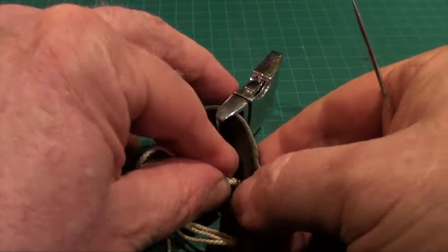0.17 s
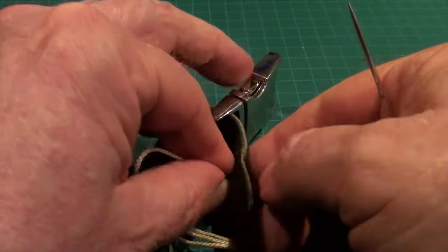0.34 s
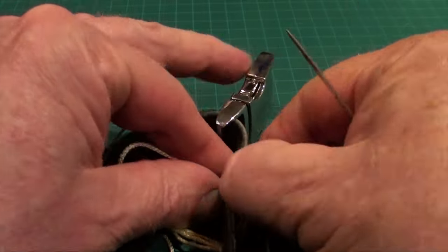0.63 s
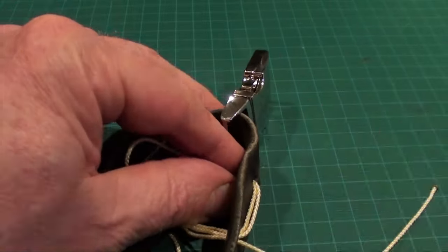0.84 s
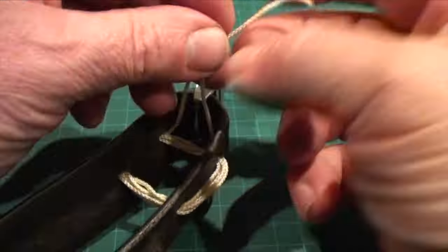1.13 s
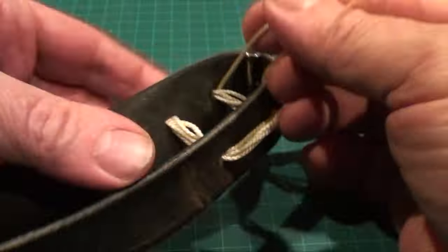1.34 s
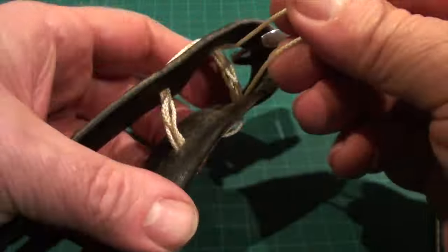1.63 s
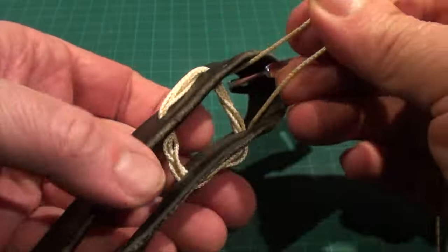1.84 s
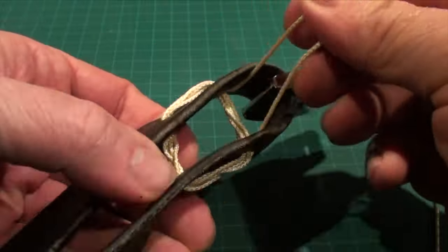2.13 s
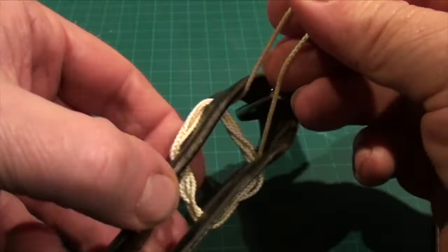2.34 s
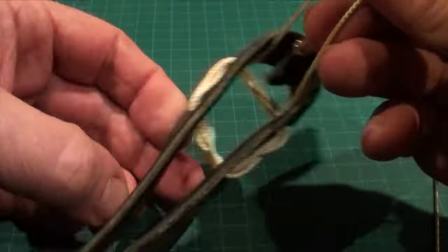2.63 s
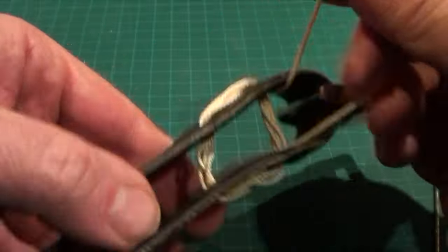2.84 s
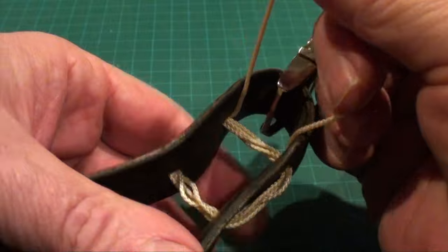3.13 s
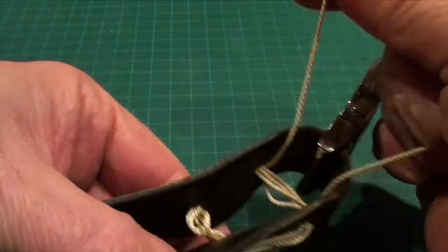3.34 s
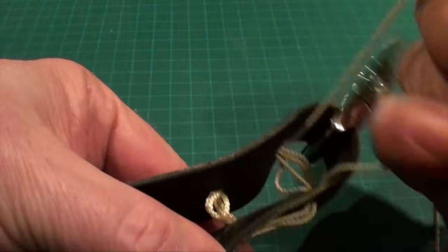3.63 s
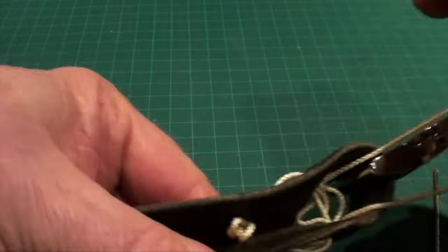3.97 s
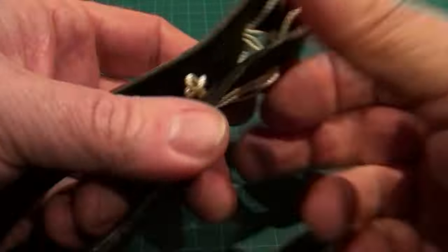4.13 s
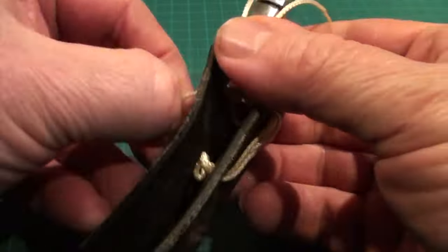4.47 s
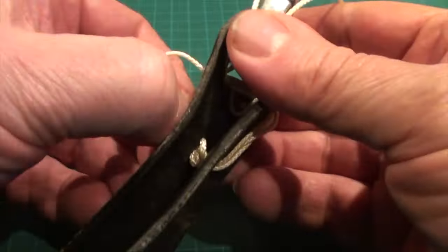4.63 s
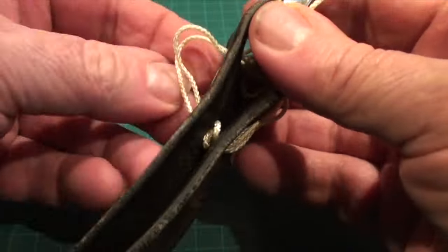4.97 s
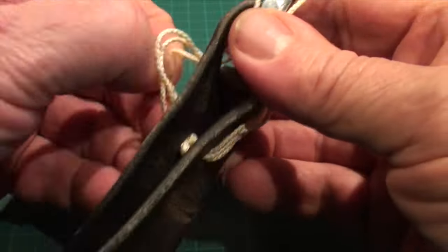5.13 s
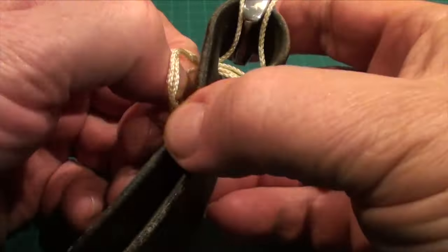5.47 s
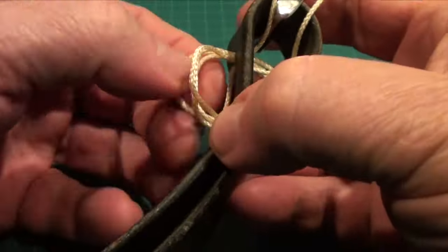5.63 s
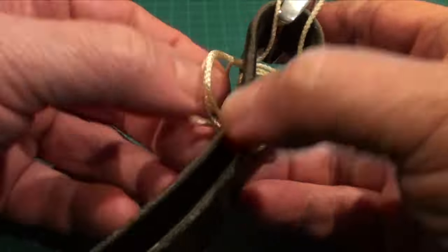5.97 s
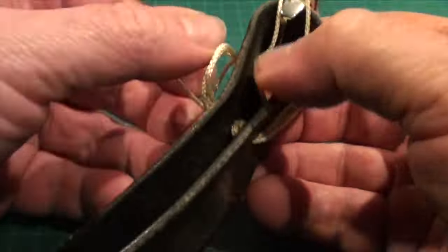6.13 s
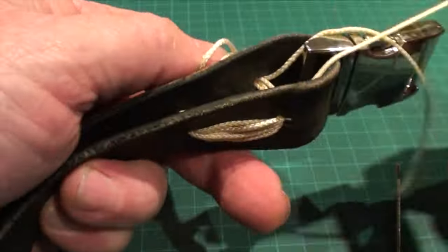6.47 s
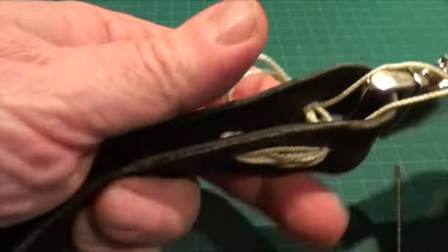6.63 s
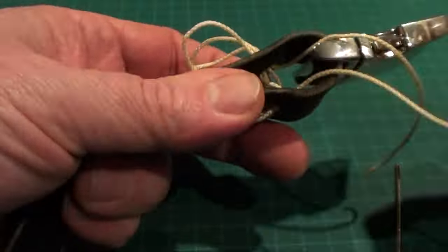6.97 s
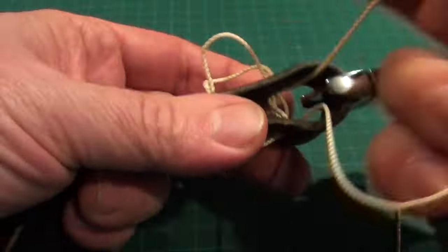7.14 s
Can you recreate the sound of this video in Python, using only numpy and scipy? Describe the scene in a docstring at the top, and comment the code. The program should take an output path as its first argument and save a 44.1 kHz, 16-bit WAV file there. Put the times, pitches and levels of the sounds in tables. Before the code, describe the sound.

Close, bright metal clicks, dry cord and leather rustles and a dull early double knock in a quiet humming room, busiest mid-way and at the end.

```python
"""Buckle, cord and leather at a bench

Close up in a small room, hands draw a cord through a leather strap: a steel buckle clicks as decaying modes
and noise cracks, cord and fingers rub as swelling grainy noise, and short low notes with puffs of noise make
soft thuds and the dull body under some clicks. The cord hisses in its hole and thin squeaks glide. Behind lie
shaped-noise hum, rumble and air, steady notes, a thin whine, and a bird beyond a window: rising sine whistles."""
import sys
import numpy as np
from scipy import signal
from scipy.fft import rfft, irfft, next_fast_len
from scipy.io import wavfile
from scipy.ndimage import map_coordinates

SR = 44100
rng = np.random.default_rng(int(sys.argv[2]) if len(sys.argv) > 2 else 0)


def wrap_up_sound(samples):
    """Save the sound to the file named by the first command line argument, as 16-bit audio."""
    columns = np.atleast_2d(samples).T
    # keep every value between -1 and 1, then stretch to whole-number steps
    tamed = np.clip(columns, -1, 1)
    steps = np.round(tamed * 32767).astype(np.int16)
    wavfile.write(sys.argv[1], SR, steps)


N = 321909  # length in samples


def amp(db):
    """Decibels to linear gain."""
    return 10 ** (np.asarray(db) / 20)


def unit(x):
    """Scale to an rms of 1."""
    return x / np.sqrt(np.mean(x ** 2) + 1e-20)


def along(points, hz):
    """Read (f/Hz, value) points on a log frequency axis."""
    f, v = np.transpose(points)
    return np.interp(np.log(hz + 1), np.log(f + 1), v)


def curves(rows):
    """One value per sample for each column after the time."""
    s, *cols = np.transpose(rows)
    return [np.interp(np.arange(N) / SR, s, c) for c in cols]


def wobble(rate):
    """A smooth random curve, rate knots a second."""
    knots = rng.standard_normal(int(N * rate / SR) + 4)
    return map_coordinates(knots, [np.arange(N) * rate / SR])


def filtered(x, response):
    """x times a response of frequency."""
    m = next_fast_len(x.shape[-1] + 8192)
    spectrum = rfft(x, m) * response(np.fft.rfftfreq(m, 1 / SR))
    return irfft(spectrum, m)[..., :x.shape[-1]]


def band(x, low_hz, high_hz):
    """A causal band-pass."""
    edges = [low_hz, min(high_hz, .45 * SR)]
    return signal.sosfilt(signal.butter(2, edges, "bandpass", fs=SR, output="sos"), x)


def bell(centre_hz, octaves):
    """A filter response with one soft hump, octaves wide to one standard deviation."""
    return lambda hz: np.exp(-.5 * (np.log2(hz / centre_hz + 1e-6) / octaves) ** 2)


def add(track, s, sound):
    """Mix a sound in at a time."""
    part = track[..., round(s * SR):][..., :sound.shape[-1]]
    part += sound[..., :part.shape[-1]]


# stereo width of the room noise: f/Hz, side minus mid level/dB
WIDTH = [(60, -16), (110, -31), (200, -34), (380, -21.5), (700, -7.5), (1290, -1.5), (2380, -4.5),
         (4400, -8.5), (8120, -10.5), (15000, -42)]


def rush(spectrum):
    """Diffuse stereo noise: independent mid and side, the mid at rms 1."""
    shape = lambda hz: amp(along(spectrum, hz)) * [np.ones_like(hz), amp(along(WIDTH, hz))]
    mid, side = filtered(rng.standard_normal((2, N)), shape)
    return np.array([mid + side, mid - side]) / np.std(mid)


# colour of the hum, before its low cut: f/Hz, relative level per Hz/dB
HUM = [(50, -69), (85, -11.5), (167, -5.5), (206, -1), (236, -4.5), (325, -11), (396, -3), (529, -15),
       (584, -16.5), (779, -22), (851, -35.5), (890, -30), (1010, -48), (1100, -33), (1200, -35),
       (1560, -37.5), (2640, -120)]
# loudness of the hum, before its low cut: t/s, level/dB
HUM_DB = [(0, -43), (1.3, -43.5), (1.7, -43), (3.4, -45), (3.7, -43), (4.7, -44.5), (7.3, -45.5)]
# narrow notes in the hum: f/Hz, mean peak level/dB
ROOM_TONES = [(215.3, -55), (236.9, -47.5), (285.3, -53.5), (376.8, -60), (839.8, -65.5)]


def hum():
    """Low shaped noise, nearly steady, with narrow notes that waver in level and phase."""
    t = np.arange(N) / SR
    level = amp(curves(HUM_DB)[0] + 0.4 * wobble(2.81))
    low_cut = lambda hz: 1 / (1 + (106 / (hz + 1)) ** 14)
    out = level * filtered(rush(HUM), low_cut)
    for hz, db in ROOM_TONES:
        # the lower the note, the more its level wavers
        out += amp(db + 900 / hz * wobble(6.4)) * np.sin(2 * np.pi * hz * t + 0.78 * wobble(4))
    return out


# the bench and the floor rumble: t/s, level/dB
RUMBLE = [(0, -79), (.55, -60.5), (.75, -69), (1.35, -71), (1.7, -54.5), (1.82, -47), (2.01, -84),
          (2.15, -59), (2.26, -69), (3.5, -74), (4.49, -68), (5.05, -73), (7.3, -78)]


def rumble():
    """A narrow noise band at 72 Hz that comes and goes, over a faint broad bed of low noise."""
    narrow = lambda hz: np.exp(-.5 * ((hz - 72) / 11) ** 2)
    moving = amp(curves(RUMBLE)[0]) * unit(filtered(rng.standard_normal(N), narrow))
    deep = amp(-70.0) * unit(filtered(rng.standard_normal(N), bell(70, 2.6)))
    return moving + deep


# colour of the room's air: f/Hz, relative level per Hz/dB
AIR = [(530, -8.5), (900, -3), (2020, -6.5), (2600, -7.5), (2830, -8), (5280, -7.5), (6030, -8),
       (8150, -10), (16000, -13.5)]


def air():
    """Smooth wide noise with a slightly uneasy level."""
    mean_db = -55
    return amp(mean_db + 0.4 * wobble(5.1)) * rush(AIR)


# thin tone: t/s, mean f/Hz, mean level/dB
WHINE = [(0, 2507, -60.5), (1.2, 2515, -65.5), (2.5, 2500, -69), (5.3, 2520, -67.5), (7.3, 2590, -70)]


def whine():
    """A drifting sine with a weak octave, its fundamental offset in phase between the channels."""
    hz, db = curves(WHINE)
    turn = 2 * np.pi * np.cumsum(hz + 6 * wobble(17)) / SR
    tone = np.sin(turn + np.array([[0], [1.2]])) + 0.21 * np.sin(2 * turn)
    return amp(db + 2.1 * wobble(25)) * tone


def room_tone():
    """The background bed: four independent layers simply add."""
    return hum() + rumble() + air() + whine()


# bird calls: t/s, relative level/dB, share of the rise left out (0-1), top f/Hz, length/s
BIRD = [(5.318, -60, .45, 4420, .155), (5.495, -58, 0, 4460, .115), (5.64, -58, 0, 4360, .11),
        (5.784, -59, 0, 4320, .12), (5.928, -58.5, 0, 4310, .11), (6.07, -58, 0, 4310, .105)]


def bird():
    """A rising, fluttering, slightly hoarse sine whistle repeated, thickened by close echoes."""
    low_hz, glide_s, knee = 2650, .031, 1.7  # climbs almost straight, then bends over onto its top pitch
    swell_s, fade_db_per_s = .024, 10
    flutter_hz, flutter_db = 42, 2.5
    out = np.zeros(N)
    for start, level_db, left_out, top_hz, length in BIRD:
        t = np.arange(int(length * SR)) / SR
        hz = top_hz - (top_hz - low_hz) * np.exp(-(t / glide_s) ** knee)
        swell = np.clip((t - left_out * glide_s * 2) / swell_s, 0, 1)
        close = np.clip((length - t) / swell_s, 0, 1)
        shape = swell * amp(-fade_db_per_s * t) * close
        flutter = amp(flutter_db * np.sin(2 * np.pi * (flutter_hz * t + rng.random())))
        tone = np.sqrt(2) * np.sin(2 * np.pi * np.cumsum(hz) / SR)
        add(out, start, amp(level_db) * shape * flutter * tone)
    out = out * amp(1.5 * wobble(50)) * (0.85 + .4 * wobble(500))  # hoarseness
    # nearby walls outside repeat it at once and thicken the rise: (lag s, dB)
    echoes = [(.005, -6), (.011, -11), (.024, -16), (.043, -15)]
    return out + sum(amp(db) * np.roll(out, round(lag * SR)) for lag, db in echoes)


# soft thuds, and the dull low body under some buckle and leather clicks:
# t/s, level/dB, f/Hz, contact/s, left minus right level/dB
THUDS = [(0.528, -34.5, 1270, 0.00067, 0), (0.547, -39, 1310, 0.00061, 0), (1.0145, -23, 755, 0.0014, -7.5),
         (1.0274, -17.5, 670, 0.001, 4.5), (1.0385, -26.5, 496, 0.0013, -4), (1.162, -36, 1420, 0.001, 1),
         (1.29, -40, 700, 0.0018, -1), (4.26, -34, 1950, 0.00054, -1), (3.593, -47, 1320, 0.00055, 0),
         (3.739, -36, 1610, 0.00037, -4)]


def thuds():
    """A soft blow: a short note that swells and dies with the contact, a low push and a puff of noise."""
    out, t = np.zeros((2, N)), np.arange(SR // 8) / SR
    for s, db, hz, contact, pan_db in THUDS:
        press = lambda length: t / length * np.exp(1 - t / length)
        note = press(contact) * np.sin(2 * np.pi * hz * t)
        push = 0.5 * press(2.0 * contact) * np.sin(2 * np.pi * 0.374 * hz * t)
        noise = unit(band(rng.standard_normal(len(t)), 0.048 * hz, 3 * hz))
        puff = 0.27 * press(1.95 * contact) * noise
        sides_db = np.array([[pan_db / 2], [-pan_db / 2]])
        add(out, s, amp(db + sides_db) * (note + push + puff))
    return out


# the cord whistles in its hole: t/s, centre f/Hz, level/dB
HISS = [(4.93, 7400, -69), (5.018, 7250, -63), (5.118, 6700, -58), (5.2, 6850, -55), (5.27, 7000, -56),
        (5.33, 6900, -66)]


def whistle():
    """A narrow hiss, low noise multiplied by a sine, whose centre drifts as the cord runs."""
    hz, db = curves(HISS)
    t = np.arange(N) / SR
    first, last = HISS[0][0], HISS[-1][0]
    running = np.interp(t, [first, first + .04, last - .04, last], [0, 1, 1, 0])
    width = unit(band(rng.standard_normal(N), 4.3, 340))
    carrier = np.sqrt(2) * np.sin(2 * np.pi * np.cumsum(hz) / SR)
    return running * amp(db) * width * carrier


# faint thin squeaks: start t/s, end t/s, start f/Hz, end f/Hz, mean level at mid-squeak/dB
SQUEAKS = [(4.612, 4.68, 5900, 6200, -63), (4.62, 4.648, 4430, 4480, -64), (4.78, 4.815, 4780, 4850, -61),
           (6.076, 6.145, 2600, 2760, -65), (1.303, 1.35, 2950, 2920, -62)]


def squeaks():
    """Short gliding sines with an unsteady level."""
    out = np.zeros(N)
    for start, end, start_hz, end_hz, db in SQUEAKS:
        count = round((end - start) * SR)
        hz = np.linspace(start_hz, end_hz, count)
        tone = np.sin(2 * np.pi * np.cumsum(hz) / SR)
        add(out, start, amp(db) * np.sqrt(2 * np.hanning(count)) * tone)
    return out * amp(2 * wobble(120))


# cord and fingers on leather: start t/s, length/s, level before the swell/dB, centre f/Hz, width/octaves
STROKES = [(0.522, 0.068, -49, 2800, 1.3), (0.752, 0.065, -52, 4000, 1.6), (0.996, 0.1, -45.5, 2000, 1.3),
           (0.998, 0.14, -42.5, 550, 0.72), (1.097, 0.08, -53, 1440, .2), (1.07, 0.11, -53.5, 2190, 1.9),
           (1.149, 0.023, -49.5, 2260, 0.57), (1.338, 0.23, -50, 5330, 0.81),
           (1.737, 0.24, -59.5, 7600, .5), (2.153, 0.27, -57.5, 11100, 1.6), (2.413, 0.094, -55, 4000, 1.1),
           (3.183, 0.43, -58.5, 5570, 0.74), (3.592, 0.11, -46.5, 5600, 0.6), (3.673, 0.18, -50, 4000, 3.7),
           (3.858, 0.12, -57, 11000, 3.9), (3.968, 0.2, -55, 4000, 1.2), (4.17, 0.23, -53.5, 1890, 1.5),
           (4.358, 0.13, -56.5, 1150, 0.79), (4.264, 0.11, -60, 11100, 1.6), (4.65, 0.18, -54, 4100, 1.1),
           (5.151, 0.09, -45.5, 4030, 1.6), (5.151, 0.073, -49.5, 3200, 0.1), (5.41, 0.081, -55, 4320, 1.4),
           (5.957, 0.27, -61, 4000, 0.89), (6.199, 0.19, -52.5, 5860, 0.69), (6.454, 0.17, -43.5, 4300, 1),
           (6.644, 0.19, -50, 5600, 1), (6.902, 0.33, -53, 4230, 1.04), (7.182, 0.099, -45, 8000, 0.78)]


def rubbing():
    """Fibres catch and slip: grainy noise that swells and fades with each stroke."""
    rise, square = .35, .8  # share spent swelling; a power under 1 holds the stroke and ends it abruptly
    out = np.zeros(N)
    grain = amp(2.8 * wobble(900) + 2.1 * wobble(120)) * rng.standard_normal(N)
    for start, length, db, centre_hz, width in STROKES:
        piece = grain[round(start * SR):][:round(length * SR)]
        progress = np.arange(len(piece)) / (length * SR)
        swell = np.sin(np.pi / 2 * np.interp(progress, [0, rise, 1], [0, 1, 0])) ** square
        add(out, start, amp(db) * swell * unit(filtered(piece, bell(centre_hz, width))))
    return out


def ticks():
    """Faint chance contacts shaken out by each stroke, as rows like CLICKS; four tries a stroke."""
    per_s, over_stroke_db, scatter_db, chatter_ms = 4, 3, 2, 2
    frame_hz, parts_db = 7200, (-16, -16, -2, -12, -20, -20)  # the other parts over the frame
    rows = []
    for start, length, db, *_ in STROKES:
        when, odds = rng.random((2, 4))
        size = rng.standard_normal(4)
        happens = (odds < per_s * length / 4) & (start + length * when < N / SR)
        peaks = db + over_stroke_db + scatter_db * size
        for u, peak in zip(when[happens], peaks[happens]):
            rows.append((start + length * u, peak, frame_hz, *np.add(peak, parts_db), chatter_ms))
    return rows


def strike(chatter, part, t, loose):
    """One part answers the blows with decaying sine modes and a crack of band noise, at peak 1."""
    low_hz, high_hz, crack_db, modes = part
    detune_s = .00008  # the shorter a mode lives, the more its pitch shifts from blow to blow
    long_s, loose_db, held_db = .05, 11, -3  # longer modes come out when loose, are muted when held
    hz, level, t60 = np.transpose(modes)[:, :, None]
    level_scatter, pitch_scatter = rng.standard_normal((2, len(modes), 1))
    level = level + (t60 > long_s) * (loose_db if loose else held_db)
    decay = amp(level + 4 * level_scatter - 60 * t / t60)
    mode_hz = hz * (1 + detune_s / t60 * pitch_scatter)
    ring = np.sum(decay * np.sin(2 * np.pi * mode_hz * t), 0)
    ring = signal.fftconvolve(chatter, ring)[:len(t)]
    crack = band(band(chatter, low_hz, high_hz), 0.76 * low_hz, 6.5 * high_hz)
    crack = np.pad(crack, (0, len(t) - len(chatter)))
    sound = ring / np.abs(ring).max() + amp(crack_db) * crack / np.abs(crack).max()
    return sound / np.abs(sound).max()


# buckle contacts: t/s, frame peak level/dB, frame f/Hz as gripped, then peak level/dB of lower ring note,
# upper ring note, leather loop, prong, bar, roller; chatter/ms (time to fall 12 dB)
CLICKS = [(0.2456, -66.0, 6200.0, -30.5, -62, -57, -58.0, -66.0, -66.0, 1.9),
          (0.5284, -39, 7700.0, -53, -57, -34.5, -54.0, -53, -66.0, 4.1),
          (0.5484, -50, 6500.0, -55, -58, -49, -63.0, -57.0, -66.0, 9),
          (0.611, -51.0, 7100.0, -66.0, -60, -42, -66.0, -64.0, -66.0, 2.2),
          (0.6312, -43.0, 6500, -55.0, -66.0, -45, -37, -53, -58, 5.4),
          (0.7354, -48, 7200, -26, -57, -27.5, -52, -63.0, -63.0, 3.2),
          (0.796, -31, 7800, -45, -58, -49, -52, -65.0, -66.0, 4.5),
          (1.0137, -35, 7160, -32, -47.0, -31, -64.0, -56.0, -64.0, 4.5),
          (1.0334, -38, 6560, -40, -45.0, -48, -66.0, -61.0, -66.0, 10.0),
          (1.2414, -50, 8700, -66.0, -66.0, -45, -58.0, -66.0, -66.0, 3.2),
          (1.2627, -54, 6800.0, -28, -60, -35, -51, -60.0, -66.0, 4.9),
          (1.289, -35.0, 6600, -27.5, -51, -33, -44.0, -42, -57.0, 4.7),
          (1.3956, -35, 7130, -36, -54, -38.5, -46, -62.0, -59.0, 11),
          (1.407, -52.0, 6200.0, -34, -59.0, -46, -66.0, -51.0, -66.0, 3.2),
          (1.478, -38.0, 8000.0, -58, -68, -47, -51.0, -45, -53.0, 2.2),
          (1.8128, -38, 6900, -51.0, -43, -57, -56.0, -61.0, -59.0, 6.7),
          (1.8265, -31, 6170, -44, -60, -46, -52, -64.0, -66.0, 1.7),
          (2.0328, -26, 7540, -66.0, -50, -52, -43, -66.0, -46, 4.9),
          (2.0862, -39, 8100, -61.0, -61, -48, -62.0, -66.0, -64.0, 1.5),
          (2.2975, -26, 7990, -39, -53, -50, -36, -56.0, -53.0, 2.8),
          (2.3454, -27.5, 7900, -34.5, -47, -48, -38, -65.0, -65.0, 2.7),
          (2.4473, -42, 6840, -43.0, -63.0, -51, -61.0, -54.0, -63.0, 9.3),
          (2.4578, -50, 7100.0, -38, -39, -51, -55.0, -53.0, -66.0, 6.2),
          (2.5189, -31.5, 6930, -41, -48, -65, -43.0, -31.5, -50.0, 2.8),
          (2.6324, -34.5, 7650, -27.5, -54, -65, -39, -44, -60.0, 16),
          (2.6573, -25.5, 7630, -37, -46, -50, -44, -20, -24, 3.4),
          (2.7197, -39, 8050, -42, -63, -66.0, -66.0, -66.0, -44, 2.2),
          (2.7455, -34, 7740, -36, -51, -36, -52.0, -61.0, -66.0, 3.6),
          (2.7612, -31, 6850, -36, -44.5, -47, -35, -39, -43.0, 5.9),
          (2.7803, -38, 6840, -42, -49, -56.0, -47.0, -43, -50.0, 1.5),
          (2.9202, -33.5, 6200, -47, -55, -44, -39, -66.0, -54.0, 1.6),
          (2.944, -36, 6200.0, -55, -63.0, -45, -53.0, -66.0, -62.0, 3.6),
          (3.1018, -34, 7800, -53.0, -48, -48, -52, -54.0, -60.0, 5.2),
          (3.1199, -33, 7860, -39, -57.0, -66.0, -47.0, -38.5, -62.0, 7.4),
          (3.1443, -39, 6760, -40, -48, -62, -66.0, -66.0, -66.0, 2.2),
          (3.2175, -40.5, 7000, -50.0, -47.0, -44.0, -58.0, -66.0, -66.0, 4.9),
          (3.2625, -47.0, 6350, -59.0, -60, -46.0, -66.0, -66.0, -66.0, 1.5),
          (3.2828, -33.5, 6160, -48, -47, -40, -42, -40, -52, 2.8),
          (3.295, -67, 6800.0, -54.0, -45, -36, -66.0, -66.0, -66.0, 2.7),
          (3.3811, -37, 7900, -35.5, -65.0, -36.5, -55, -66.0, -60.0, 3.1),
          (3.5332, -23.5, 8000, -47, -56, -61, -25, -29, -57.0, 3.9),
          (3.584, -39, 7400.0, -49.0, -52, -42, -56.0, -66.0, -66.0, 6.5),
          (3.5922, -21.0, 7200, -20, -25, -29, -26.5, -44, -52.0, 3.8),
          (3.614, -29, 7700.0, -66.0, -65.0, -37, -47.0, -59.0, -50.0, 3.2),
          (3.6284, -13, 7130, -45, -57, -48, -19, -20, -32, 3.4),
          (3.6556, -23, 6600, -33, -40, -53, -40.0, -64.0, -64.0, 4),
          (3.69, -35, 8500, -43, -45, -57.0, -65.0, -61.0, -60.0, 2.2),
          (3.7125, -35, 7100.0, -36, -47.0, -49, -49.0, -60.0, -60.0, 4.9),
          (3.7254, -32, 8300, -68, -69, -66.0, -66.0, -66.0, -59.0, 1.5),
          (3.733, -35, 7700.0, -32, -36, -54, -66.0, -56.0, -51, 6.3),
          (3.7379, -37, 8600.0, -24, -63.0, -63.0, -63.0, -37, -63.0, 1.3),
          (3.748, -41.0, 6500.0, -66.0, -34, -66.0, -50.0, -49.0, -43.0, 4.5),
          (3.7742, -23.5, 7600, -27.5, -31, -64, -36, -38, -35, 8.3),
          (3.796, -36, 8000.0, -66.0, -27, -50, -38, -56.0, -66.0, 5.9),
          (3.8691, -38, 7700.0, -38.0, -51, -49, -57.0, -51.0, -62.0, 3.5),
          (3.8802, -37, 7900, -33, -50, -56, -49.0, -45, -58.0, 3.5),
          (3.92, -51.0, 8000.0, -45, -44, -36, -66.0, -66.0, -66.0, 2.2),
          (3.9287, -37, 7060, -44, -48, -55.0, -54.0, -50.0, -66.0, 9.3),
          (3.9569, -22, 6380, -34, -39, -51, -39.0, -31, -43.0, 3.6),
          (4.0243, -37, 7500, -38, -49, -40, -54.0, -58.0, -66.0, 13),
          (4.0383, -26.5, 6000, -52, -49, -38, -47.0, -44, -65.0, 3.9),
          (4.0734, -36, 7350, -37, -45.0, -42, -36, -55, -58.0, 0.99),
          (4.1187, -38, 6800.0, -42.0, -46, -46, -52.0, -63.0, -66.0, 1.7),
          (4.135, -37, 7800, -42, -55.0, -54.0, -59.0, -60.0, -59.0, 9.6),
          (4.1742, -31.5, 7300, -40.0, -46, -35.5, -32.5, -43, -42, 6.2),
          (4.2607, -54, 6500.0, -52.0, -51, -28.5, -66.0, -66.0, -65.0, 3.5),
          (4.2667, -55, 7100.0, -45, -66.0, -31, -66.0, -66.0, -66.0, 1.5),
          (4.372, -40, 7160, -40, -58, -36, -55.0, -66.0, -58.0, 1),
          (4.4075, -34.5, 8500, -66.0, -66.0, -46, -37, -60.0, -66.0, 0.94),
          (4.5271, -37.5, 7000, -40, -54, -49, -47.0, -42, -54.0, 2.9),
          (4.6116, -58, 6200.0, -55, -65, -34.5, -60.0, -64, -61.0, 1.2),
          (4.6693, -33, 7500, -50, -66.0, -42, -35, -58.0, -52, 3.2),
          (4.8286, -40, 7940, -63, -67, -32, -48, -59, -54, 2.5),
          (4.9556, -33.5, 7060, -57.0, -64.0, -49, -57.0, -44, -65.0, 2.7),
          (5.0424, -40, 7600.0, -49, -66.0, -38.5, -60.0, -47, -65.0, 4),
          (5.1527, -40, 7060, -51, -57.0, -52, -54.0, -47, -55.0, 10.0),
          (5.1836, -35, 7150, -52.0, -55.0, -42, -54.0, -51.0, -56.0, 10.0),
          (5.2107, -27, 7800, -50, -48, -21.5, -43.0, -48.0, -38, 3),
          (5.239, -48.0, 7700.0, -43, -66.0, -30, -53.0, -59.0, -55.0, 3.2),
          (5.247, -24, 7150, -30, -54.0, -35, -49, -33, -61.0, 1.3),
          (5.3956, -41, 6800.0, -49, -60.0, -41, -66.0, -66.0, -66.0, 7.7),
          (5.4159, -32, 8000.0, -50, -53.0, -27.5, -40.0, -32, -43, 1.8),
          (5.4345, -35, 7800, -59.0, -57.0, -52, -54.0, -60.0, -58.0, 2),
          (5.453, -43, 6200.0, -54.0, -57.0, -42, -58, -61.0, -66.0, 10.0),
          (5.5877, -31, 8630, -46, -49, -35, -47.0, -45, -46, 3.6),
          (5.768, -45, 8600.0, -48, -66.0, -42, -58.0, -51, -65.0, 1.6),
          (5.8944, -63, 7400.0, -62, -67, -38.5, -66.0, -64.0, -66.0, 2.2),
          (6.0202, -39.5, 7060, -52, -48, -43, -62.0, -59, -54, 4),
          (6.029, -46, 8600.0, -66.0, -66.0, -49, -66.0, -66.0, -66.0, 1.5),
          (6.3377, -36, 6600, -54.0, -38.0, -42, -50.0, -66.0, -55.0, 6.5),
          (6.3485, -46, 8000.0, -38.0, -35, -34.5, -48.0, -58.0, -44, 3.2),
          (6.3623, -30.5, 7100, -42, -58.0, -43.0, -48.0, -49.0, -66.0, 1.1),
          (6.407, -36, 7800, -66.0, -59.0, -45.0, -55.0, -66.0, -66.0, 5.8),
          (6.4254, -56.0, 8000.0, -46.0, -50, -40, -66.0, -66.0, -66.0, 4.2),
          (6.4637, -39, 7400.0, -55, -61.0, -57, -53.0, -46, -51.0, 11),
          (6.5011, -35, 6500, -41, -47, -43, -48.0, -49.0, -52.0, 10.0),
          (6.5204, -38, 6830, -66.0, -66.0, -33, -54.0, -55, -60.0, 5.7),
          (6.533, -46.0, 6500.0, -50.0, -49.0, -40, -66.0, -57.0, -66.0, 6.5),
          (6.5475, -35, 6730, -45, -47.0, -36, -36, -47.0, -49.0, 9),
          (6.563, -35, 6350, -46.0, -62.0, -28, -54.0, -64.0, -65.0, 2.9),
          (6.574, -33.0, 6200.0, -38, -36, -41, -38, -38, -48.0, 6.7),
          (6.6308, -49, 7100.0, -46.0, -47, -39, -65.0, -64.0, -65.0, 2.8),
          (6.6424, -66.0, 6500.0, -58.0, -66.0, -38, -66.0, -61.0, -66.0, 4.5),
          (6.652, -66.0, 6240, -44, -66.0, -59.0, -66.0, -66.0, -64.0, 2.2),
          (6.6868, -16.5, 6840, -29, -44, -25, -14, -48, -47, 5.1),
          (6.7566, -30, 7250, -33, -37, -33, -30, -45.0, -55.0, 3.2),
          (6.765, -24.5, 7230, -33, -58, -38, -25, -37, -37, 2.9),
          (6.8485, -38, 6480, -52, -56, -56, -48, -56.0, -66.0, 6),
          (7.006, -38, 8100, -57.0, -54.0, -45, -61.0, -61.0, -66.0, 2.2),
          (7.073, -23.5, 7700, -26, -51, -32.5, -30, -51.0, -54.0, 3),
          (7.1207, -32, 7700.0, -40.0, -66.0, -53, -38.0, -33, -54.0, 1.7),
          (7.1451, -28, 7700.0, -27.5, -46, -35, -44, -23.5, -48, 3.2),
          (7.2052, -17, 7780, -42, -55.0, -39, -29, -55.0, -37.0, 5.2),
          (7.2085, -32, 7840, -23, -59.0, -25, -26, -44.0, -59.0, 4.5),
          (7.2175, -11, 7460, -54.0, -49, -33, -16, -43, -32, 1.7),
          (7.2527, -37.0, 6200.0, -26.5, -43, -37, -44.0, -57.0, -48.0, 0.93),
          (7.2734, -37.0, 7500, -46, -58.0, -42, -49.0, -66.0, -66.0, 10.0),
          (7.2826, -21, 7850, -42, -45.0, -45, -27, -54.0, -56.0, 1.9),
          (7.2924, -24, 7320, -40, -36, -41, -27, -60.0, -44.0, 10.0)]
# lower ring note, upper ring note, loop, prong, bar, roller: crack low f/Hz, crack high f/Hz,
# crack over ring level/dB, modes of (nominal f/Hz, nominal level/dB, t60/s)
PARTS = [ (4800, 5700, -6, [(5325, -15, .09), (5345, 0, .022), (5250, -6, .012)]),
         (5400, 6200, -3, [(5735, -11, .06), (5750, 0, .02)]), (2150, 4740, 3.5, [(3480, 2, 0.039),
         (3690, 13, 0.0059), (4600, -2, 0.004)]), (10500, 15600, 8, [(13300, 9, .014), (14150, 10, .012),
         (15150, 2, .012)]), (11000, 12000, -4, [(11450, 0, .013), (11420, -19, .06)]),
         (12300, 13000, -17, [(12700, -5, .09), (12680, 0, .02), (15150, -9, .07)]), ]
# the frame, columns as in PARTS, but its mode pitches are multiples of the frame note
FRAME = (6160, 7820, 3, [(1, 1, 0.028), (0.89, -4, .02), (0.93, -24, .07), (1.1, -8, 0.012)])
# fingers close on the metal and stop its ring: t/s
GRIPS = [3.812]
# contacts while the metal hangs loose: t/s
LOOSE = [.2456, 1.2627, 1.289, 2.4578, 2.6324, 2.6573, 3.7379, 3.748, 3.7742, 5.0424, 6.4254, 6.574, 6.652,
         7.1451]


def buckle():
    """Each contact is a short chatter of tiny blows that rings every part as hard as it is struck."""
    out, t = np.zeros(N), np.arange(SR // 7) / SR
    span = t[:SR // 25]
    for s, frame_db, frame_hz, *levels, chatter_ms in list(CLICKS) + ticks():
        frame = (*FRAME[:3], np.multiply(FRAME[3], [frame_hz, 1, 1]))
        next_grip = min([g for g in GRIPS if g > s], default=99)
        ungripped = np.clip((next_grip - s - t) / .003, 0, 1)
        loose = np.abs(np.subtract(LOOSE, s)).min() < .003
        onset = 1 - np.exp(-span / 0.00013)
        fade = amp(-12 * (span / (chatter_ms / 1000)) ** 0.75) * onset
        blow_sizes = amp(0.66 * rng.standard_normal(len(span)))
        chatter = fade * rng.standard_normal(len(span)) * blow_sizes
        for db, part in zip([frame_db, *levels], [frame, *PARTS]):
            add(out, s, amp(db) * ungripped * strike(chatter, part, t, loose))
    return band(out, 1500, 25000)


def bench(x):
    """Quick reflections off the bench: a decaying noise tail, opposite in the two channels."""
    level_db, t60 = -20, .006
    t = np.arange(SR // 50) / SR
    tail = amp(-60 * t / t60) * rng.standard_normal(len(t))
    reflected = signal.fftconvolve(x, tail / np.linalg.norm(tail))[:N]
    return amp(level_db) * reflected * np.array([[1], [-1]])


# decay of the room: f/Hz, t60/s
WALLS = [(200, 0.12), (2000, 0.84), (6000, 0.3), (15000, 0.025)]


def walls(x):
    """The room's answer, a stereo noise tail in which each frequency dies at its own speed."""
    hz, t, z = signal.stft(rng.standard_normal((2, SR // 3)), SR, nperseg=256)
    decay = amp(-60 * t / along(WALLS, hz)[:, None])
    tail = signal.istft(z * decay, SR, nperseg=256)[1]
    delayed = np.pad(x, (130, 0))[None]  # samples before the first reflection
    return signal.fftconvolve(delayed, tail / np.linalg.norm(tail[0]), axes=1)[:, :N]


# placement of the hands: left, then right level/dB
PAN_DB = [
    [-.35],
    [.35],
]


def scene():
    """The hands work just right of centre; the room answers them softly."""
    near = buckle() + rubbing() + whistle() + squeaks()
    blows, song = thuds(), bird()
    direct = near * amp(PAN_DB) + bench(near) + blows + amp(3.5) * song
    to_walls = amp(-29) * near + amp(-15) * blows.mean(0) + amp(-25) * song
    return direct + walls(to_walls) + room_tone()


def record(dry):
    """A sharp low-pass leaves nothing above the band limit."""
    top_hz = 15900
    return filtered(dry, lambda hz: hz < top_hz)


dry = scene()
out = record(dry)
wrap_up_sound(out)
```